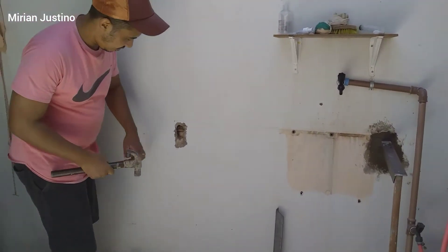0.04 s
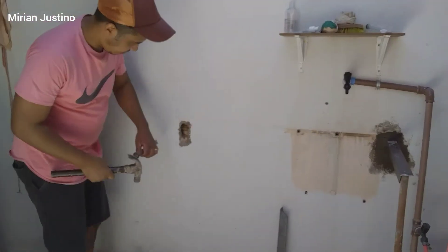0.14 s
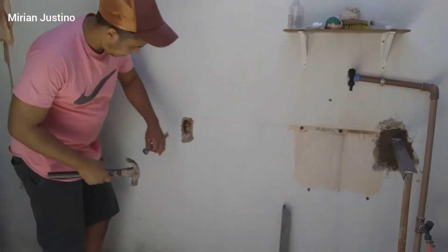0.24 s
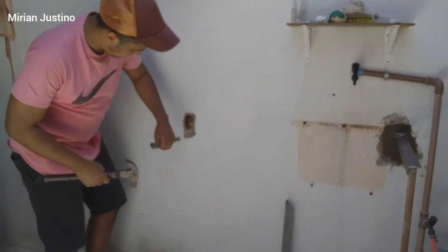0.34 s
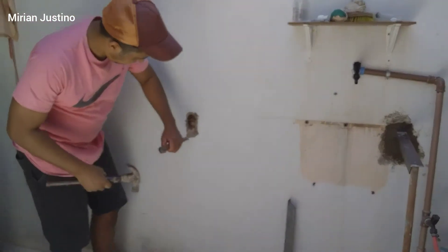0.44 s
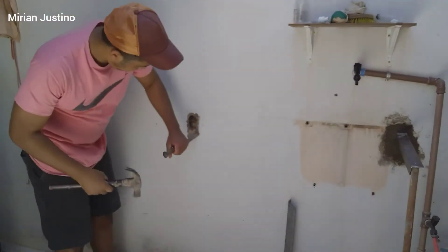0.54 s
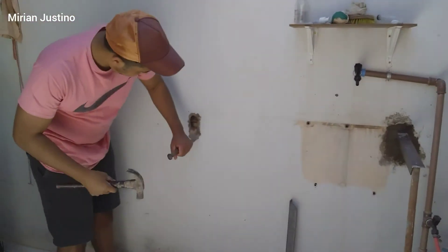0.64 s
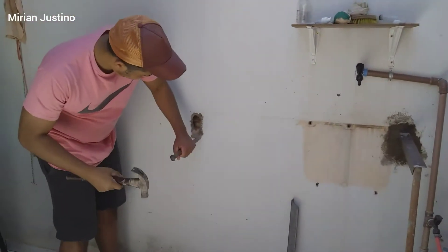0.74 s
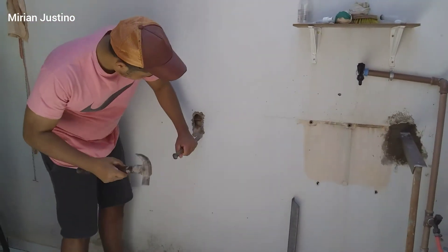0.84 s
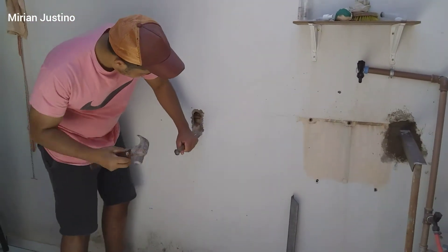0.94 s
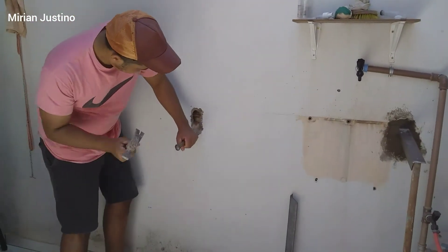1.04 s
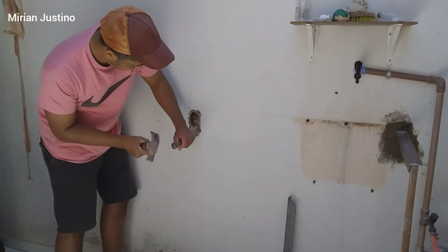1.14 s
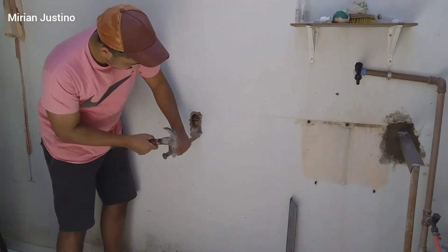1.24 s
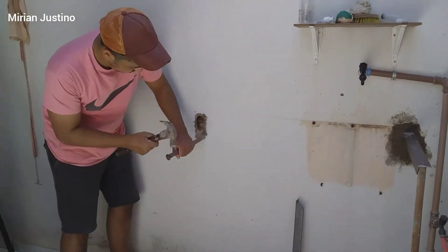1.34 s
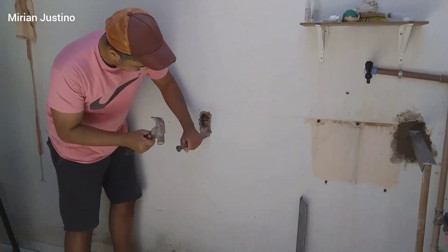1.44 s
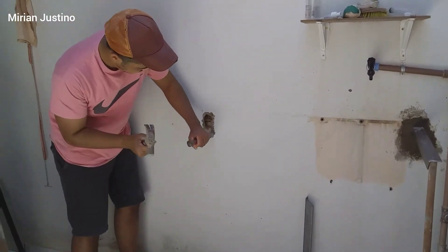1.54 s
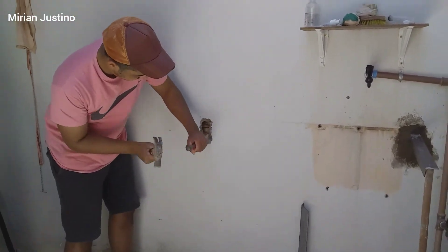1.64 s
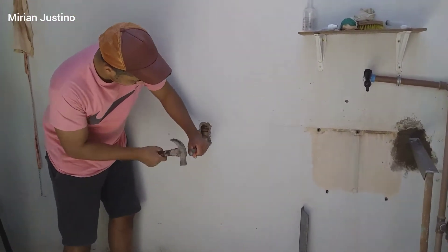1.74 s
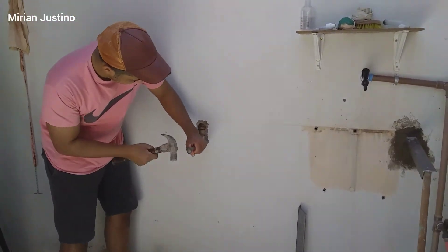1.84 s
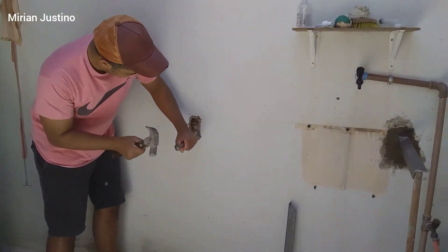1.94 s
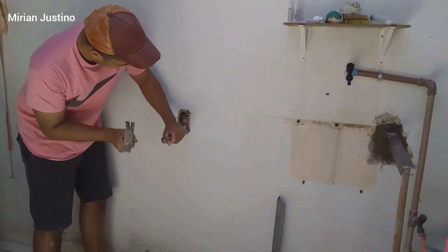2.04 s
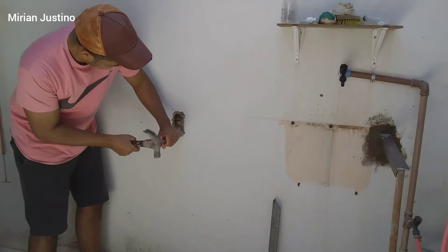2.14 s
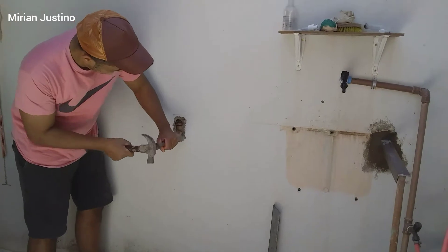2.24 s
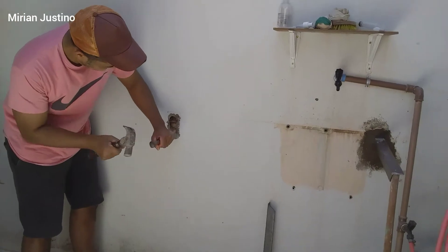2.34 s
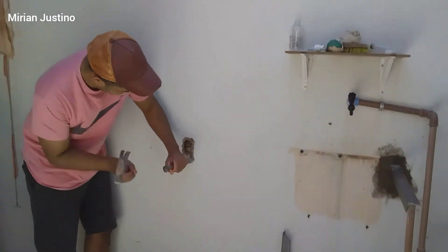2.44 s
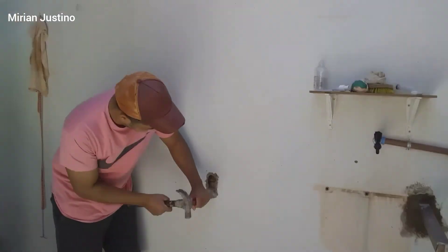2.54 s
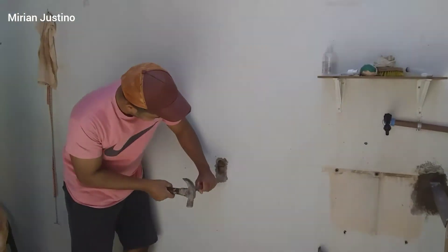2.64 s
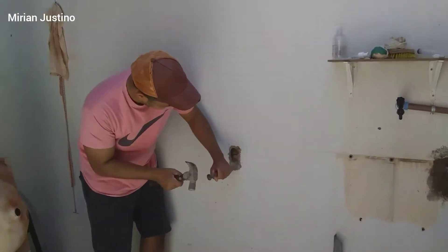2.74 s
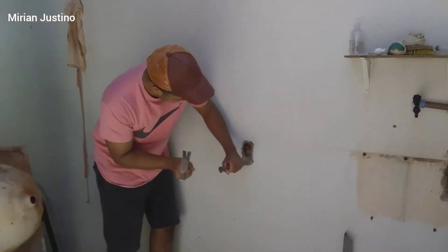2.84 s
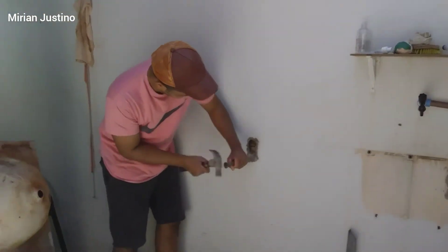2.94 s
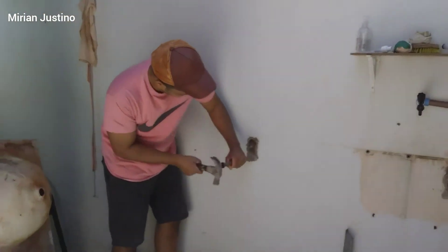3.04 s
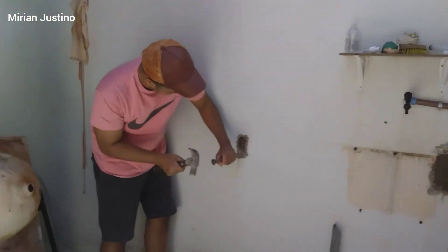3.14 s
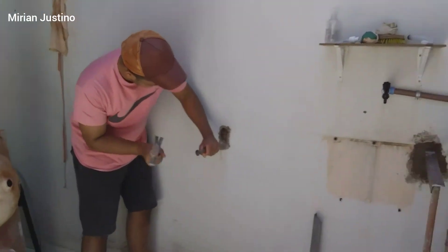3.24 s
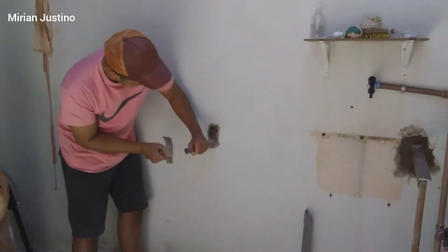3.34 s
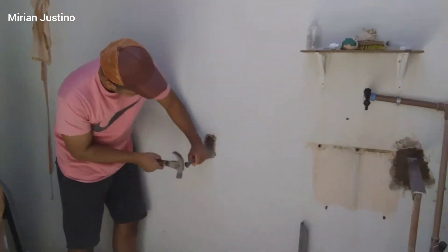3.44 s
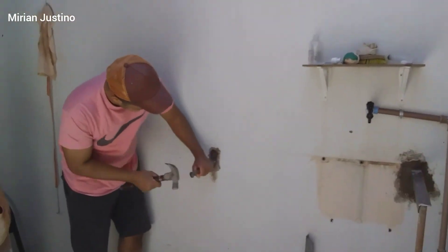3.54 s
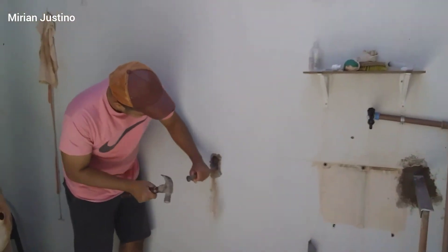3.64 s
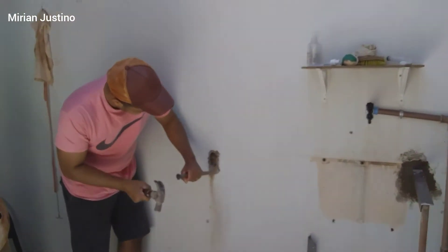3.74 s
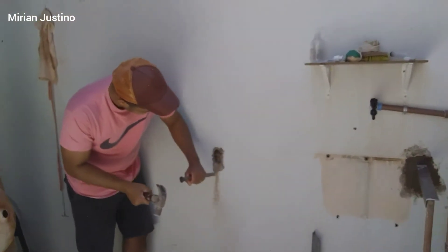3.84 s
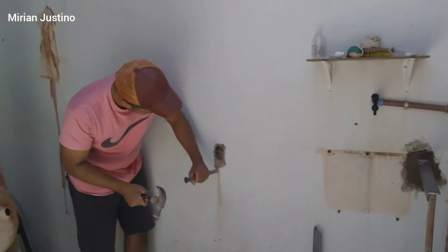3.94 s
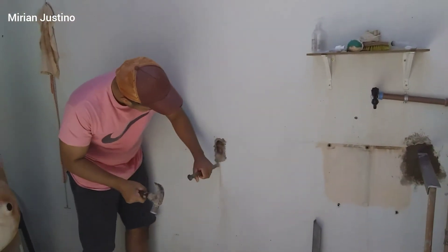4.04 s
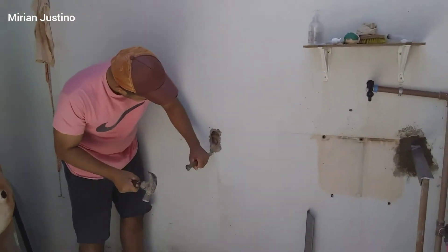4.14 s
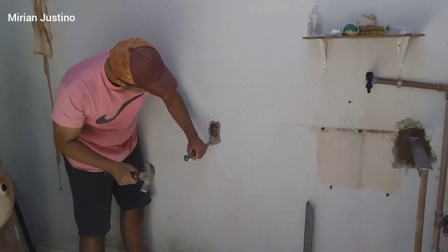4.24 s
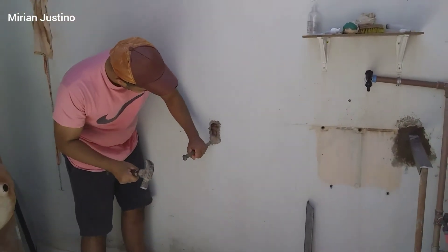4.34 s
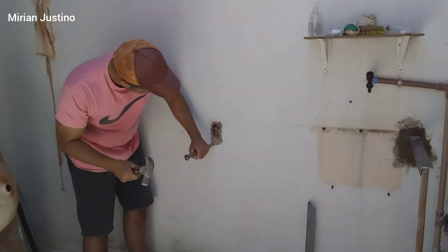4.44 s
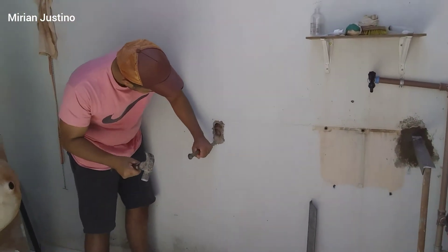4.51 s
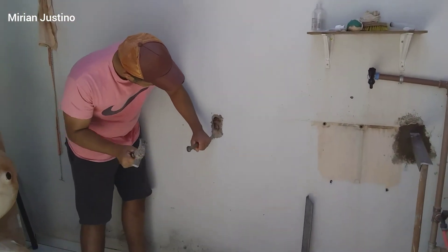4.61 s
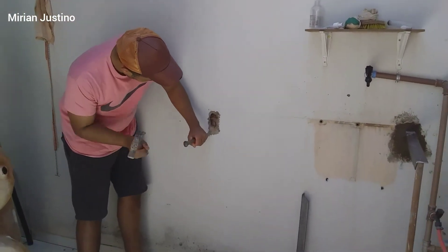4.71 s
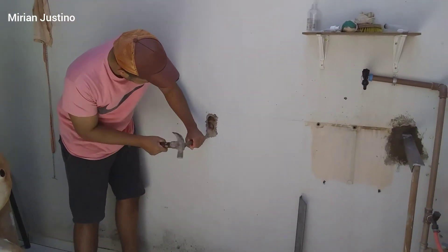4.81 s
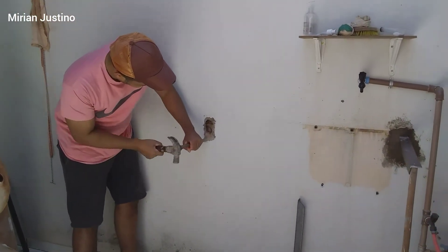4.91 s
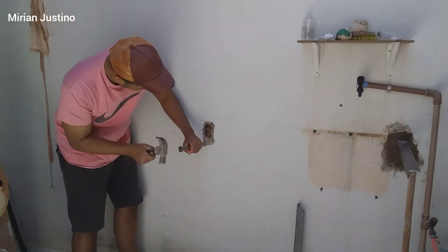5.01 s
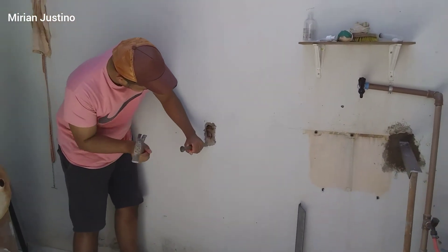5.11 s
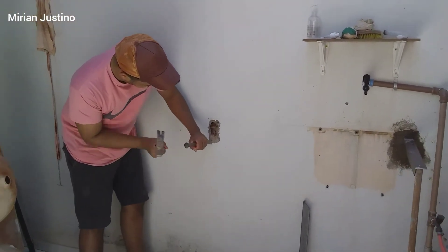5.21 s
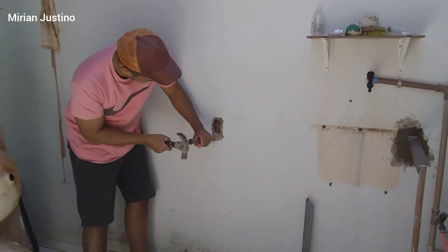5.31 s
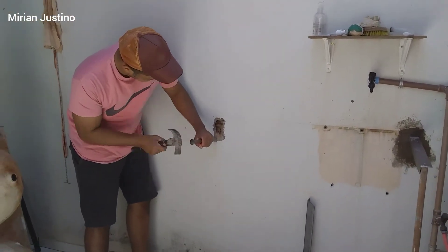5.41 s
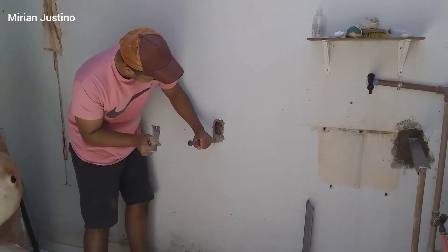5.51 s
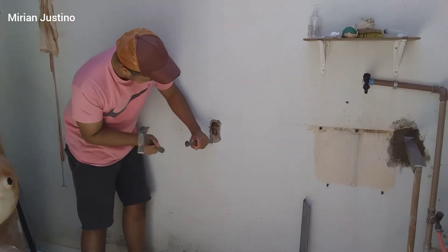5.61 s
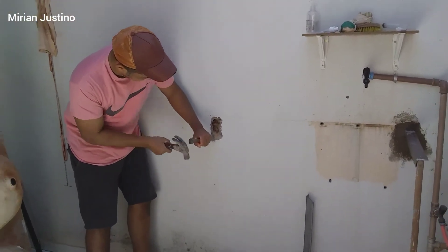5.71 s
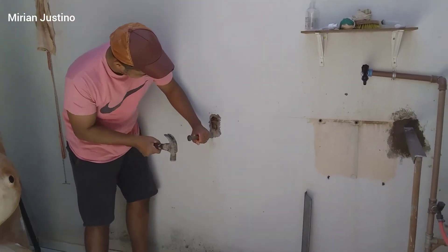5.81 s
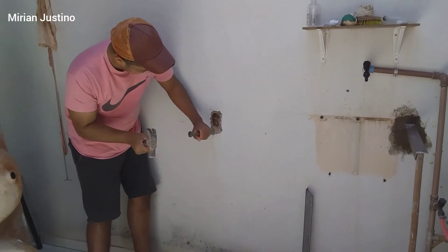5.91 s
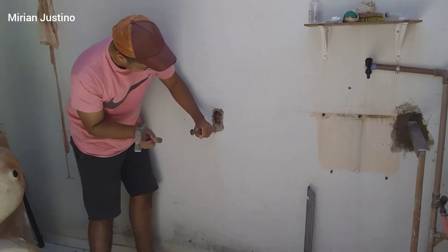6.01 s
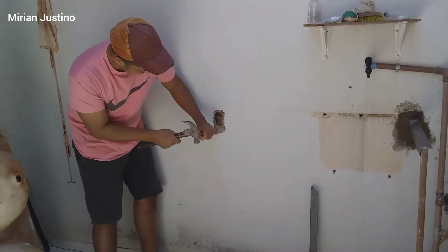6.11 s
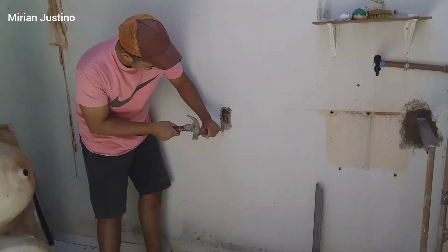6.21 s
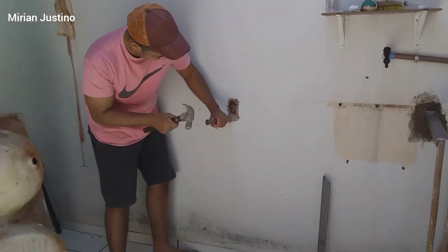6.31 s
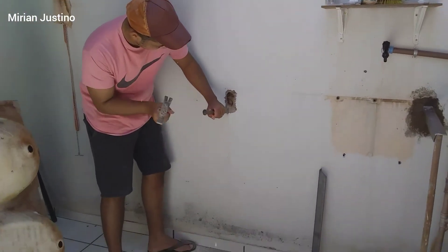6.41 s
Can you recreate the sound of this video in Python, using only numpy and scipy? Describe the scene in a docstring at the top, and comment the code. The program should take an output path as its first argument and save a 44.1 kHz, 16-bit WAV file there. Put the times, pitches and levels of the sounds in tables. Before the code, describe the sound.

Close up in a small, hard-walled room, a steel tip scrapes and ticks against masonry with a light tap. Six hard hammer blows follow at a steady pace, each a bright crack, brief steel ring and dull wall thud. Crumbs fall, a near-quiet pause holds tiny taps and a faint bird, then four more blows.

```python
"""Small bare room: a hammer drives a steel chisel into a brick wall, ten blows in two bouts and three light taps.
Noisy contacts excite steel modes, brick crack and wall thud with standing waves, in noise-built room echoes.
Tip scrapes and falling grit are dense clicks; knocks are short bursts; the bird outside is narrow noise bands.
Distant rumble is shaped noise. A close pair of microphones hears it all through a fast limiter."""
import sys
import numpy as np
from scipy import signal
from scipy.fft import rfft, irfft, next_fast_len
from scipy.io import wavfile

SR = 44100
rng = np.random.default_rng(int(sys.argv[2]) if len(sys.argv) > 2 else 0)


def makeup_ratio(level_db):
    """Linear amplitude ratio for a level in decibels (20 dB per factor of ten)."""
    decades = np.asarray(level_db, float) / 20
    return 10 ** decades


def dump_mix(stems):
    """Bounce the given channels to the path in sys.argv[1] as a 16-bit WAV at rate SR."""
    frames = np.atleast_2d(stems).T  # one column per channel
    limited = np.clip(frames, -1, 1)  # hard clip at full scale
    pcm = np.round(limited * 32767).astype(np.int16)
    wavfile.write(sys.argv[1], SR, pcm)


N = 284886
SCENE_S = np.arange(N) / SR
TAIL = 2 ** 15   # samples per event
TAIL_S = np.arange(TAIL) / SR
HZ = np.maximum(np.fft.rfftfreq(TAIL, 1 / SR), 1)

# pitches at which the steel's ring level is set: f/Hz
RING_HZ = [2883, 4650, 4938, 5390, 5783, 8200, 9364, 10540, 11900]


def rms_one(x, size=None):
    """Scale to rms 1 over the first size samples."""
    return x / np.sqrt(np.mean(x[:size] ** 2) + 1e-20)


def at_hz(points, hz):
    """Interpolate a (f/Hz, value) table on a log-frequency axis."""
    points_hz, values = np.transpose(points)
    return np.interp(np.log(hz), np.log(points_hz), values)


def coloured(x, spectrum):
    """Filter by a (f/Hz, gain/dB) spectrum."""
    size = next_fast_len(len(x))
    hz = np.maximum(np.fft.rfftfreq(size, 1 / SR), 1)
    return irfft(rfft(x, size) * makeup_ratio(at_hz(spectrum, hz)), size)[:len(x)]


def bandpass(x, order, low_hz, high_hz):
    """Butterworth band-pass."""
    return signal.sosfilt(signal.butter(order, [low_hz, high_hz], "band", fs=SR, output="sos"), x)


def add(out, s, sound):
    """Mix a sound in at s seconds, its last fifth faded to nothing."""
    i = round(s * SR)
    fade = np.clip(4 - 5 * np.arange(TAIL) / TAIL, 0, 1)
    out[i:i + TAIL] += (sound * fade)[:N - i]


def room():
    """Response from one spot: direct sound, then dense echoes that swell and die octave by octave."""
    # t60 of the room: f/Hz, t60/s
    room_t60 = [(50, 0.25), (130, 0.45), (350, 0.4), (920, 0.32), (2430, 0.24), (6400, 0.26), (13000, 0.15)]
    # faint answer of the next room: f/Hz, level/dB
    next_room = [(100, -15), (1000, -19), (4000, -26.5), (6000, -18.5), (9000, -40.5)]
    next_room_t60_s = 0.6
    echo_db, echo_rise_s = -1.5, 0.0054
    echoes = np.zeros(TAIL)
    white = rfft(rng.standard_normal(TAIL))
    for hz in 32 * 2 ** np.arange(10):
        octave = np.cos(np.pi / 2 * np.clip(np.log2(HZ / hz), -1, 1)) ** 2
        t60_s = at_hz(room_t60, hz)
        fading = makeup_ratio(-60 * TAIL_S / t60_s)
        fading = fading + makeup_ratio(at_hz(next_room, hz) - 60 * TAIL_S / next_room_t60_s)
        # slower decay, lower start
        echoes += irfft(white * octave, TAIL) * fading / np.sqrt(t60_s * SR / (2 * np.log(1000)))
    echoes *= makeup_ratio(echo_db) * (1 - np.exp(-TAIL_S / echo_rise_s))
    echoes[0] += 1   # direct sound
    return rfft(echoes)


def contact(length_s):
    """Spectrum of a noisy contact that builds quickly, lasts its length and stops."""
    rise_s = 0.0022
    envelope = (1 - np.exp(-TAIL_S / rise_s)) * np.exp(-(TAIL_S / max(length_s, 0.001)) ** 2)
    return rfft(rng.standard_normal(TAIL) * envelope)


def burst(spectrum, length_s, walls):
    """A short contact noise, coloured and heard in the room; rms 1 over its first 2600 samples (59 ms)."""
    return rms_one(irfft(contact(length_s) * makeup_ratio(at_hz(spectrum, HZ)) * walls, TAIL), size=2600)


def modes(table, force, extra_db=None):
    """A force rings decaying modes that waver in level and phase; levels are rms over the first 59 ms."""
    waver_per_s, waver = 50, 0.6   # waver: rms of level share, half the phase in rad
    knots_s = np.arange(0, 1, 1 / waver_per_s)
    out = np.zeros(TAIL)
    for hz, mode_db, t60_s in table:
        wander = waver * rng.standard_normal((2, len(knots_s)))
        swell, slip = [np.interp(TAIL_S, knots_s, v) for v in wander]
        ring = (1 + swell) * np.sin(2 * np.pi * hz * TAIL_S + 2 * slip) * makeup_ratio(-60 * TAIL_S / t60_s)
        ring_db = 0 if extra_db is None else np.interp(hz, RING_HZ, extra_db)
        out += makeup_ratio(mode_db + ring_db) * rms_one(irfft(rfft(ring) * force, TAIL), size=2600)
    return out


def thud(length_s, walls):
    """One clean push plus crumbling shakes the wall a little late and starts the room's standing waves."""
    # wall spectrum: f/Hz, level/dB
    wall_spectrum = [(25, -39.5), (45, -19.5), (65, 9), (180, 2.5), (400, 8.5), (800, 5.5), (1500, -6),
                     (3000, -32.5), (9000, -74.5)]
    # low standing waves: f/Hz, level re wall/dB, t60/s
    standing_waves = [(58.2, -20, 0.5), (113.6, -20, 0.3), (180, -11, 0.3), (331.6, -17, 0.45),
                      (470, -16, 0.22), (675, -14, 0.1)]
    # standing waves carry no treble: f/Hz, gain/dB
    boom_top = [(900, 0), (2500, -40)]
    lag_s = 0.003
    force = (1 + 0.14 * contact(length_s)) * np.exp(-2j * np.pi * HZ * lag_s)
    body = rms_one(irfft(force * makeup_ratio(at_hz(wall_spectrum, HZ)) * walls, TAIL), size=2600)
    booms = coloured(modes(standing_waves, force), boom_top)
    onset = np.sin(np.pi / 2 * np.minimum(TAIL_S / lag_s, 1)) ** 2
    return (body + booms) * onset


def rumble():
    """Distant rumble: noise through a fixed spectrum, its level drifting."""
    # f/Hz, level/dB
    rumble_spectrum = [(24, -35), (40, 3.5), (102, 14), (193, 7.5), (1060, -9), (1290, -23), (2000, -29),
                       (2600, -34.5), (4400, -120)]
    # t/s, level/dB
    rumble_level = [(0, -80), (.3, -73.5), (1.148, -67), (1.702, -59), (2.551, -67), (3.35, -61.5),
                    (3.902, -71), (4.1, -70), (4.32, -83), (4.45, -74), (4.8, -70.5), (5.251, -65.5),
                    (6.46, -58)]
    noise = rms_one(coloured(rng.standard_normal(N), rumble_spectrum))
    return makeup_ratio(np.interp(SCENE_S, *np.transpose(rumble_level))) * noise


def chirps():
    """Bird outside: hoarse notes, each a narrow noise band that swells, fades and lingers among the walls."""
    # t/s, length/s, f/Hz, half-width to 1/e/Hz, level/dB
    notes = [(1.465, 0.023, 6250, 150, -58.5), (1.525, 0.043, 6300, 407, -57.5),
             (4.535, 0.042, 5930, 200, -77.5), (4.569, .06, 4600, 396.6, -75.5),
             (4.59, 0.066, 6200, 608, -68.5), (4.66, 0.056, 4800, 703, -63.5), (5.6, .05, 6080, 299, -72.5)]
    echo_db, echo_t60_s = -5, 0.7
    out = np.zeros(N)
    for s, length_s, hz, width_hz, note_db in notes:
        shape = np.exp(-((HZ - hz) / width_hz) ** 2)
        band = rms_one(irfft(rfft(rng.standard_normal(TAIL)) * shape, TAIL))
        progress = np.minimum(TAIL_S / length_s, 1)
        linger = makeup_ratio(echo_db - 60 * TAIL_S / echo_t60_s) * progress
        add(out, s, makeup_ratio(note_db) * band * (np.sin(np.pi * progress) + linger))
    return out


def grit():
    """Tip scrapes and grit spills: dense clicks of uneven size in a dull and a bright band, over faint dust."""
    # t/s, length/s, bright band at start/dB, bright band at end/dB, dull band below bright/dB
    spills = [(0.025, 0.039, -80, -72, 3), (0.063, 0.041, -54, -47, -2), (0.13, 0.11, -70, -65, -6),
              (0.339, 0.022, -67, -56.5, -2.5), (0.41, 0.07, -79, -76, -6.5),
              (0.502, 0.063, -61, -54.5, -2.5), (0.67, 0.26, -73, -76, -2.5),
              (0.892, 0.37, -68.5, -67.5, 6.5), (1.171, .062, -70, -37, -3), (1.36, 0.094, -67, -70, 11),
              (1.581, 0.079, -58, -63.5, -2), (1.674, 0.11, -56.5, -52, 2),
              (2.429, 0.084, -71.5, -75.5, -0.5), (3.292, 0.024, -38.5, -52, 0),
              (3.316, 0.066, -69, -63.5, -10), (3.674, .015, -65, -72, 3),
              (3.861, 0.063, -82.5, -83.5, -1.5), (3.919, 0.11, -81.5, -74, 4),
              (4.06, 0.072, -88.5, -88.5, 5), (4.147, .012, -59.5, -76.5, 12),
              (4.366, .06, -77.5, -90, -2.5), (4.656, 0.39, -93, -81, -15), (5.222, 0.059, -81, -73.5, 1),
              (5.88, .02, -52, -80, 4)]
    rise_db_s, fall_db_s, dust_db = 2500, 347, -93.5
    clumps_per_s, clump_db = 90, 3
    clicks = (rng.random(N) < 4000 / SR) * rng.standard_normal(N)   # 4000 clicks per s
    clicks *= makeup_ratio(3.3 * np.minimum(rng.exponential(1, N), 5))
    knots_s = np.arange(0, N / SR, 1 / clumps_per_s)
    clicks *= makeup_ratio(clump_db * np.interp(SCENE_S, knots_s, rng.standard_normal(len(knots_s))))
    clicks = signal.fftconvolve(clicks, irfft(room() + 0.33, TAIL))[:N]   # extra direct sound
    bright = rms_one(bandpass(clicks, 4, 8000, 15500))
    dull = rms_one(bandpass(clicks, 2, 2300, 8000))
    out = makeup_ratio(dust_db) * (bright + dull)
    for s, length_s, start_db, end_db, dull_below_db in spills:
        end_s = s + length_s
        spill_db = np.interp(SCENE_S, [s, end_s], [start_db, end_db])
        spill_db -= rise_db_s * np.maximum(s - SCENE_S, 0)
        spill_db -= fall_db_s * np.maximum(SCENE_S - s - length_s, 0)
        out += makeup_ratio(spill_db) * (bright + dull * makeup_ratio(-dull_below_db))
    return out


def knocks():
    """Small knocks of tip, chips and feet: a bright burst plus a dull thud."""
    # t/s, bright part/dB, dull part/dB
    small_knocks = [(0.0708, -70, -77), (0.1017, -66, -69.5), (0.1364, -62, -77), (0.182, -50, -93),
                    (0.2069, -64, -73), (0.2334, -61.5, -74), (0.3177, -70, -78), (0.4888, -73, -77),
                    (0.5028, -51, -73), (0.549, -78, -70), (0.5816, -53.5, -81), (0.604, -50.5, -80),
                    (0.8444, -70.5, -64), (0.8959, -72.5, -64.5), (0.9742, -75.5, -77),
                    (1.0186, -74, -76.5), (1.1129, -78.5, -85), (3.2094, -62, -57.5),
                    (3.2874, -56.5, -62.5), (3.3538, -64.5, -54.5), (3.6794, -68, -95),
                    (3.9994, -71.5, -73), (4.145, -82, -92)]
    # bright part: f/Hz, level/dB
    bright_spectrum = [(710, -35.5), (1200, -9.5), (1610, 3), (2150, 3.5), (4310, 16), (13000, -4),
                       (16000, -19.5)]
    length_s = 0.0033
    out, walls = np.zeros(N), room()
    for s, bright_db, dull_db in small_knocks:
        dull = makeup_ratio(dull_db) * thud(length_s, walls)
        add(out, s, dull + makeup_ratio(bright_db) * burst(bright_spectrum, length_s, walls))
    return out


def contacts():
    """Time, crack, thud, ring level at each pitch and rattle length of every blow and tap."""
    # where the head lands shifts the share of five ring families: t/s, crack/dB,
    # then ring/dB near 2.9 kHz, 4.6 kHz, 5.3 kHz, 5.8 kHz and above 8 kHz
    full_blows = [(1.2316, -17.5, -15.5, -16, -31.5, -22, -40.5),
                  (1.7408, -19.5, -18.5, -17, -21, -12, -25.5), (2.169, -25, -25.5, -18, -24.5, -18.5, -34),
                  (2.581, -25.5, -33, -27, -15, -16.5, -31), (3.0003, -27, -26.5, -21.5, -25.5, -14, -31),
                  (3.4115, -24.5, -26, -22, -22, -18, -29), (4.8548, -16.5, -20, -11.5, -17, -9, -20.5),
                  (5.2891, -20.5, -24, -18, -30, -10.5, -26.5), (5.719, -20, -23, -18, -29, -24, -24.5),
                  (6.1501, -22.5, -37.5, -37.5, -14.5, -21.5, -29.5)]
    # light taps on the wall: t/s, crack/dB, thud/dB, ring at 5 kHz/dB, ring tilt/(dB per octave)
    light_taps = [(0.6593, -55, -33, -71.5, -16.5), (3.9436, -89, -70.5, -83, -3),
                  (4.3604, -101, -61.5, -87, 7)]
    # per pitch of RING_HZ: family index
    ring_family = [0, 1, 0, 2, 3, 4, 4, 4, 4]
    # per pitch of RING_HZ: level re family/dB
    ring_balance_db = [-0.5, -1.5, -5.5, -2, -4, -0.1, -2.3, -6.5, -8.5]
    # per pitch of RING_HZ: rms change from blow to blow/dB
    ring_scatter_db = [1, 1, 2, 1, 1, 3, 3, 3, 3]
    thud_under_crack_db, blow_rattle_s, tap_rattle_s = 3.5, 0.011, 0.015
    rows = []
    for s, crack_db, *family_db in full_blows:
        ring_db = np.take(family_db, ring_family) + ring_balance_db
        ring_db = ring_db + ring_scatter_db * rng.standard_normal(len(RING_HZ))
        rows.append((s, crack_db, crack_db - thud_under_crack_db, ring_db, blow_rattle_s))
    for s, crack_db, thud_db, ring_db, tilt_db in light_taps:
        tilted_db = ring_db + tilt_db * np.log2(np.divide(RING_HZ, 5000))
        rows.append((s, crack_db, thud_db, tilted_db, tap_rattle_s))
    return rows


def steel(ring_db, rattle_s, walls):
    """The head chatters on the chisel for a moment, setting every mode ringing in the room."""
    # modes of hammer and chisel: f/Hz, level re ring/dB, t60/s
    steel_modes = [(2349, -22, .1), (2755, -12, .05), (2883, 0, .065), (2886, -31, .65), (2925, -6, .07),
                   (3010, -12, .04), (3529, -20, .08), (4593, 0, .07), (4605, -27, .55), (4650, -10, .07),
                   (4717, -7, .06), (4938, 0, .1), (5263, -3, .04), (5390, -7, .03), (5502, -8, .05),
                   (5783, 0, .12), (5790, -28, .45), (7490, -16, .04), (8080, -8, .04), (8210, -5, .04),
                   (9364, -3, .06), (10540, -5, .04), (11830, -7, .03), (12100, -9, .025)]
    return modes(steel_modes, contact(rattle_s) * walls, ring_db)


def blows():
    """Full blows and light taps: brick crack, steel ring, wall thud; man and tools shift, so echoes differ."""
    # brick crack: f/Hz, level/dB
    crack_spectrum = [(900, 1), (2000, 1.5), (4000, 6), (5500, 2.5), (7000, -3), (11000, -5), (14500, -8.5),
                      (16500, -27.5)]
    out = np.zeros(N)
    for s, crack_db, thud_db, ring_db, rattle_s in contacts():
        walls = room()
        add(out, s, makeup_ratio(crack_db) * burst(crack_spectrum, rattle_s, walls))
        add(out, s, steel(ring_db, rattle_s, walls))
        add(out, s, makeup_ratio(thud_db) * thud(0.37 * rattle_s, walls))
    return out


def scene():
    """One centred image; the two microphones differ mostly in the treble, by a scattered side signal."""
    # f/Hz, side re mid/dB
    side_spectrum = [(100, -33.5), (300, -45.5), (700, -45.5), (1400, -37), (2800, -46), (5600, -33.5),
                     (10000, -14.5), (14000, -6)]
    mid = rumble() + chirps() + grit() + knocks() + blows()
    scatter = rng.standard_normal(3000) * np.exp(-np.arange(3000) / 500)
    scatter /= np.linalg.norm(scatter)
    side = coloured(signal.fftconvolve(mid, scatter)[:N], side_spectrum)
    return np.array([mid + side, mid - side])


def low_pass(x):
    """Removes everything above the highest recorded frequency."""
    return signal.sosfilt(signal.butter(12, 17140, fs=SR, output="sos"), x)


def record(dry):
    """Small capsules, then a limiter with quick attack and steady release, then soft saturation."""
    bass_cut_hz, top_hz = 61, 16600
    limit_db, release_db_s, attack_s = -4.5, 302, 0.00017
    # small capsules lose the deep bass
    dry = signal.sosfilt(signal.butter(2, bass_cut_hz, "high", fs=SR, output="sos"), dry)
    dry = signal.sosfilt(signal.cheby2(10, 40, top_hz, fs=SR, output="sos"), dry)
    over_db = np.maximum(20 * np.log10(np.abs(dry).max(axis=0) + 1e-9) - limit_db, 0)
    # hold each peak, released at a steady rate
    ramp_db = release_db_s * SCENE_S
    held_db = np.maximum.accumulate(over_db + ramp_db) - ramp_db
    r = np.exp(-1 / (attack_s * SR))
    limited = dry * makeup_ratio(-signal.lfilter([1 - r], [1, -r], held_db))
    return low_pass(0.98 * np.tanh(limited / 0.94))


dry = scene()
out = record(dry)
dump_mix(out)
```